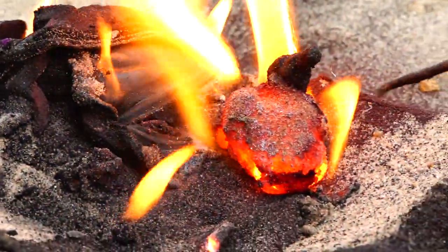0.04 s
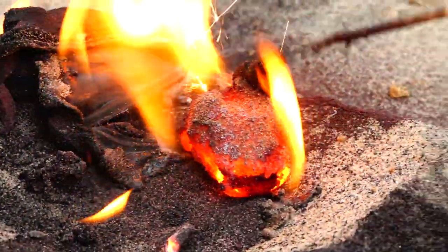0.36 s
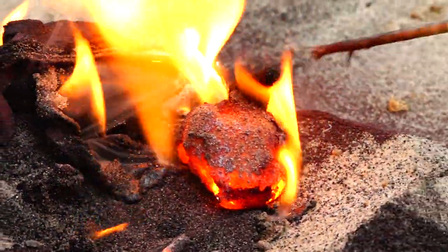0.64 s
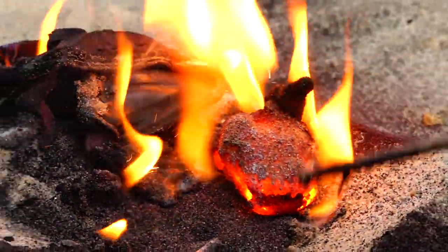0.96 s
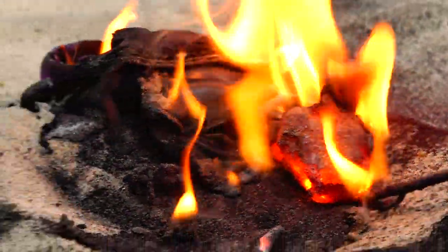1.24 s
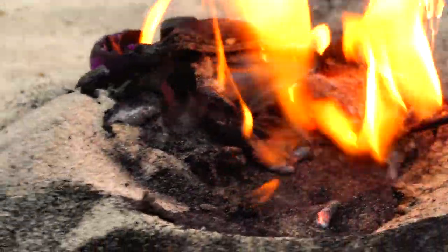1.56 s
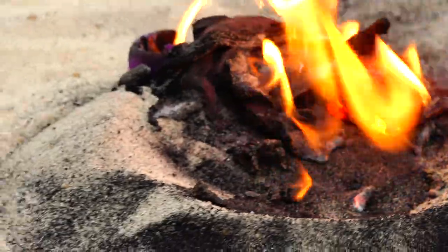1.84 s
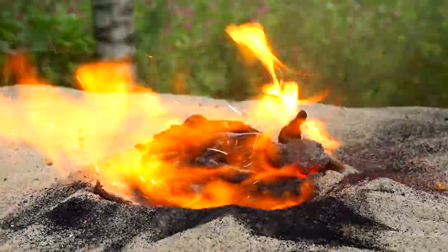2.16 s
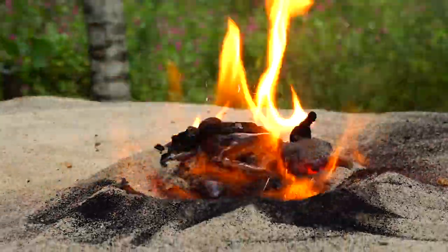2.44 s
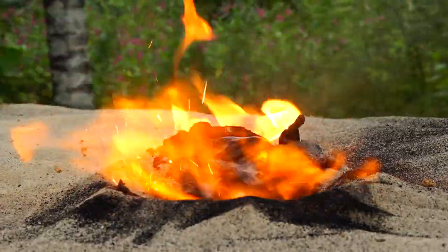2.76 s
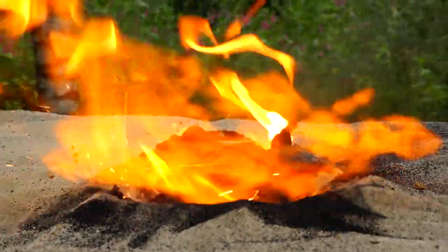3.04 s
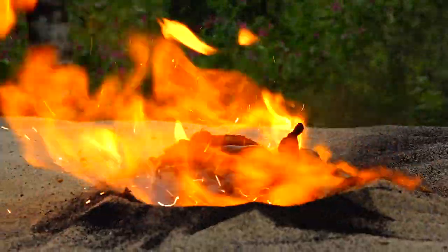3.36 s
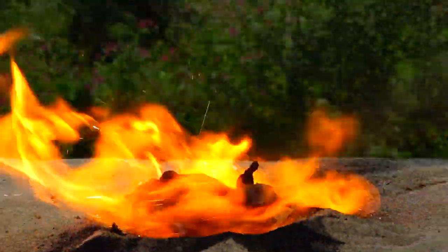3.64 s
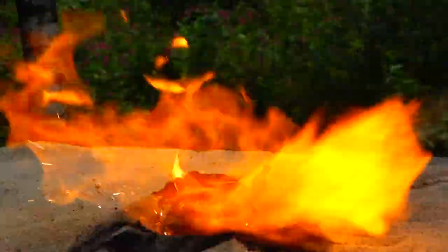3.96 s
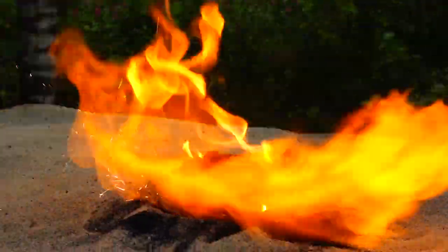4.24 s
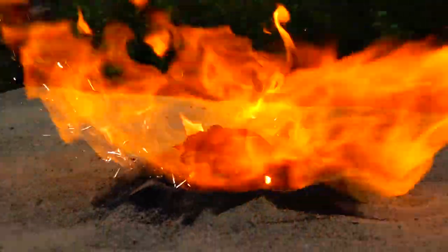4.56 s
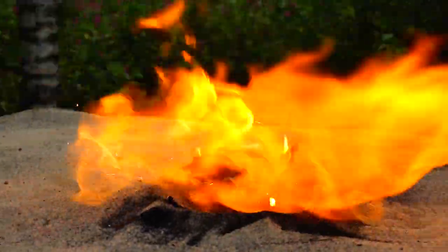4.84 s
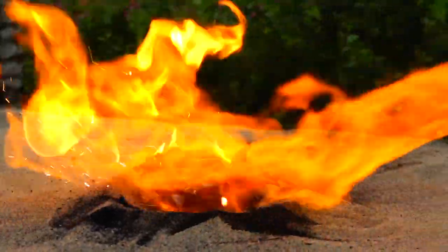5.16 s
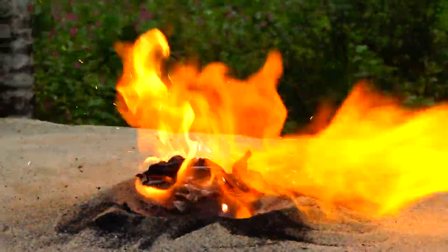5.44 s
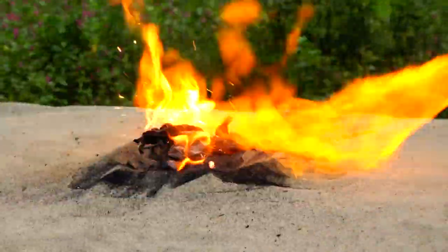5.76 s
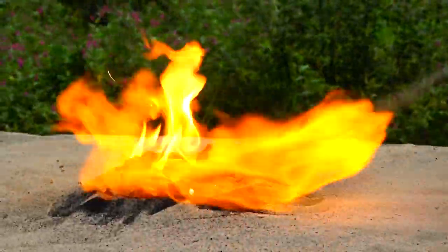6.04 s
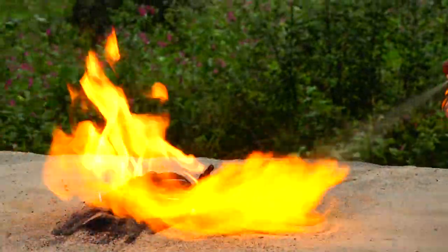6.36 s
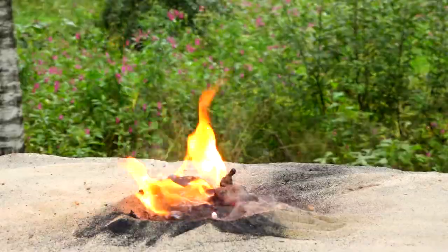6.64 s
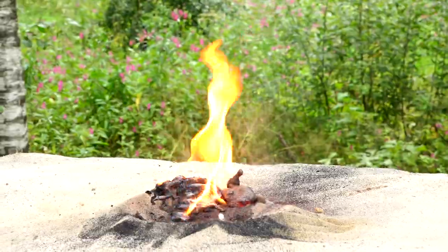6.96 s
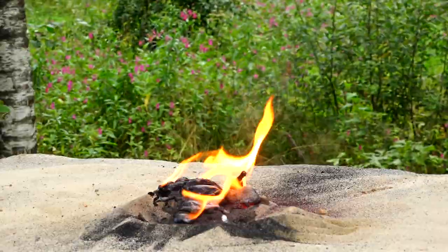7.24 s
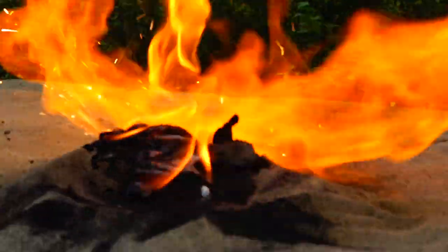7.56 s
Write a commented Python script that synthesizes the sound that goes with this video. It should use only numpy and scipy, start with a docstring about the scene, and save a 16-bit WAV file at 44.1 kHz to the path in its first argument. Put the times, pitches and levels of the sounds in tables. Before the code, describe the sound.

Embers snap softly until a spray can turns the fire into a hissing, roaring flame jet, with one long burst and one short one.

```python
"""A small fire on sand laps, puffs and crackles while a stick pokes it. At 1.9 s an aerosol can is sprayed
into it: the nozzle hisses, the spray roars as a turbulent flame jet that surges again and again, and the
ground reflection hollows the sound as things move. From 6.5 s only a few snaps and puffs remain in the
quiet outdoor air. A second, short burst follows at 7.3 s."""
import sys
import numpy as np
from scipy import signal
from scipy.fft import rfft, irfft
from scipy.io import wavfile
from scipy.ndimage import uniform_filter1d

SR = 44100
rng = np.random.default_rng(int(sys.argv[2]) if len(sys.argv) > 2 else 0)


def bounce(signal):
    """Save signal as a 16-bit WAV file at the path given by the first command-line argument."""
    frames = np.transpose(np.atleast_2d(signal))
    limited = np.clip(frames, -1, 1)
    pcm = np.round(limited * 32767).astype(np.int16)
    wavfile.write(sys.argv[1], SR, pcm)


N = 343980
FRAME, HOP = 512, 128
T = np.arange(N) / SR
FRAME_T = np.arange(N // HOP + 3) * HOP / SR
BIN_HZ = np.fft.rfftfreq(FRAME, 1 / SR)

# valve, one row per burst: open t/s, shut t/s
VALVE_S = [(1.923, 6.523), (7.282, 7.9)]


def spray_burst(burst):
    """One press of the valve: flame and hiss start and stop within milliseconds."""
    # left minus right, per burst: f/Hz, level/dB
    balance = [
        [(60, 0), (170, 1.5), (260, 5.5), (400, 9), (540, 17), (780, 7.5), (1050, 3.5), (1750, -2.5),
         (2900, 1.5), (4000, -1), (6500, -0.5), (11000, -3.5), (16000, -3.5)],
        [(60, 3), (170, 3), (260, 16), (430, 6), (700, -2), (1200, 0), (2000, -2.5), (2900, 1), (3700, -3),
         (6500, -3), (9000, -3.5), (16000, -6.5)],
    ]
    left = gain_of(spectrum(balance[burst]))
    ears = (2 * np.array([left, np.ones_like(left)]) / (1 + left))[:, None]
    open_s, shut_s = VALVE_S[burst]
    flow = np.clip((T - open_s) / 0.0094, 0, 1) * np.exp(-np.maximum(T - shut_s, 0) / 0.0071)
    ground, pit = ground_reflection(burst), hollow()
    roar = flame_jet(burst, ground * pit, ears)
    hiss = nozzle(burst, ground ** 1.2 * pit, ears)  # point source: deeper nulls
    jet = highpass(flow * (roar + hiss), hz=95)  # trims the deepest bass from roar and hiss
    return jet + scatter(jet, level_db=-28.5)


def flame_jet(burst, path, ears):
    """Burning spray: tiny ignitions and a few larger spits in turbulent noise, fluttering as a whole."""
    # steady flame as the can is aimed, per burst: t/s, roar/dB, rumble/dB, sizzle/dB
    levels = [
        [(1.94, -54, -80, -61), (2.18, -38, -55, -37), (2.45, -52.5, -68, -58.5), (2.6, -38, -54, -39.5),
         (2.85, -38.5, -57, -40), (3.05, -35, -53.5, -36), (3.55, -31, -42.5, -36), (3.8, -34.5, -49, -35.5),
         (3.98, -24, -34, -35), (4.16, -35, -42.5, -37), (4.3, -23.5, -33.5, -33.5), (4.55, -24.5, -45.5, -35),
         (5.15, -24, -48, -32), (5.5, -21.5, -41.5, -34), (5.82, -28.5, -55, -34), (6.0, -28.5, -42.5, -37),
         (6.3, -31.5, -37.5, -38.5), (6.52, -29, -39.5, -37.5)],
        [(7.29, -29.5, -28, -42), (7.39, -26, -23, -43.5), (7.46, -21.5, -32, -38.5),
         (7.63, -19.5, -25.5, -34.5), (7.8, -18.5, -24, -34)],
    ]
    # roar spectrum, per burst: f/Hz, level/dB
    shapes = [
        [(30, -54), (90, -62), (180, -17), (330, -8), (520, -1), (1050, -0.5), (1500, -6), (2400, -9.5),
         (3300, -15.5), (5000, -17.5), (6600, -20), (8500, -25.5), (11000, -39), (16000, -64)],
        [(30, -33), (90, -24), (170, -13), (270, -0.5), (440, -3), (700, -5), (900, -13), (1400, -10.5),
         (2300, -16), (3500, -19.5), (6000, -29.5), (9000, -29), (16000, -32)],
    ]
    roar_db, rumble_db, sizzle_db = follow(levels[burst])
    surge_db = 10 * np.log10(1 + surge_power() / gain_of(roar_db) ** 2)
    field = gain_of(spectrum(shapes[burst])) * path
    field *= gain_of(roar_db + surge_db - band_db(field, 400, 2500))
    # a wide flame rumbles, a tight one sizzles; surges lift both less than the roar
    bass_db = rumble_db + 0.15 * surge_db - band_db(field, 80, 330) - 2
    treble_db = sizzle_db + 0.65 * surge_db - band_db(field, 3000, 6500) - 0.52
    field *= gain_of(bass_db * spectrum([(260, 1), (600, 0.0077)]))
    field *= gain_of(treble_db * spectrum([(1400, 0.012), (3200, 0.94)]))
    turbulence = rng.standard_normal(N)
    ignitions = 0.5 * pops(per_s=3000, spread_db=3)
    spits = 0.19 * pops(per_s=250, spread_db=2)
    flutter = unit_rms(gain_of(0.85 * wander(6.6, 130)))
    drive = unit_rms(turbulence + ignitions + spits) * flutter
    return colour(drive, field * eddies(rms_db=1.02) * ears)


def surge_power(attack_s=0.017, release_s=0.015, sag_db_per_s=11):
    """Clouds of spray catch: each surge swells, sags as its cloud is used up, and dies."""
    # surges: t/s, length/s, level/dB
    surges = [(2.303, 0.038, -35.5), (2.54, 0.03, -36), (3.373, 0.039, -31.5), (3.429, 0.015, -24.5),
              (3.908, .06, -20.5), (4.03, 0.024, -23.5), (4.234, 0.091, -19), (4.338, 0.05, -26.5),
              (4.46, 0.038, -19.5), (4.541, .055, -21), (4.642, 0.2, -20), (4.882, 0.067, -20),
              (5.019, 0.037, -22.5), (5.204, 0.24, -20.5), (5.494, 0.052, -19.5), (5.563, .05, -21.5),
              (5.642, 0.11, -21.5), (5.886, 0.078, -20), (6.015, 0.068, -19), (6.08, 0.051, -21.5),
              (6.146, 0.032, -25), (6.215, 0.063, -27), (6.363, 0.052, -27), (7.34, 0.058, -23.5),
              (7.391, 0.048, -18), (7.558, .065, -21.5), (7.675, 0.074, -22.5)]
    power = np.zeros(len(FRAME_T))
    for start_s, length_s, db in surges:
        age_s = np.maximum(FRAME_T - start_s, 0)
        envelope = np.minimum(age_s / attack_s, 1) * np.exp(-np.maximum(age_s - length_s, 0) / release_s)
        power += (gain_of(db - sag_db_per_s * (age_s - length_s / 2)) * envelope) ** 2
    return power[:, None]


def nozzle(burst, path, ears):
    """Gas and droplets tear out of the can: a bright hiss with a shrill top."""
    # hiss, per burst: t/s, level/dB
    levels = [
        [(1.94, -35.5), (3.5, -35), (4.25, -39), (4.42, -43), (4.55, -36.5), (4.85, -41.5), (5.22, -37),
         (5.65, -45.5), (6.4, -40)],
        [(7.3, -30.5), (7.55, -31.5), (7.68, -44), (7.8, -49)],
    ]
    # hiss spectrum, per burst: f/Hz, level/dB
    shapes = [
        [(100, -10.5), (400, -9), (900, -5.5), (1500, -5), (4000, -4), (7500, -2), (9500, 1.5), (11300, 2.5),
         (12800, 2.5), (14500, 0.5), (16000, 1.5)],
        [(100, -30), (1500, -32), (4500, -3.5), (6500, -2), (8500, -2.5), (9600, 6), (10300, 7), (11100, 13),
         (11900, 3.5), (12700, -2), (13700, -9), (16000, -15)],
    ]
    # shrill band: t/s, emphasis/dB
    shrill = [(1.92, 7.5), (2.6, 6.5), (3.2, 2), (3.7, -1.5), (5.3, 2), (6.5, 3.5)]
    shrill_db = follow(shrill)[0] * bell(BIN_HZ - 14500, width_hz=1450)
    field = gain_of(spectrum(shapes[burst]) + shrill_db) * path
    field *= gain_of(follow(levels[burst])[0] - band_db(field, 9500, 15800) - 0.5)
    return colour(rng.standard_normal(N), field * eddies(rms_db=1) * ears)


def eddies(rms_db):
    """Short-lived patches of louder and softer turbulence."""
    noise = rng.standard_normal((len(FRAME_T), len(BIN_HZ)))
    patches = uniform_filter1d(uniform_filter1d(noise, size=10, axis=0), size=12, axis=1)
    return gain_of(rms_db * unit_rms(patches))


def ground_reflection(burst):
    """The reflection off the sand cancels the direct sound at odd multiples of the first null."""
    # first null, per burst: t/s, f/Hz, nominal depth/dB
    nulls = [
        [(1.92, 1460, -1), (2.38, 1820, 2), (2.65, 1790, 1.5), (3.28, 1945, 1), (3.45, 2000, 0),
         (3.75, 8000, -1), (3.98, 8140, 5), (4.18, 7900, -0.5), (4.32, 7350, 9.5), (4.85, 7200, 13.5),
         (5.2, 7300, 10.5), (5.4, 8500, 10), (5.52, 10500, 3), (6.1, 10800, 1), (6.3, 8000, 1.5)],
        [(7.28, 3700, 3.5), (7.55, 3520, 10), (7.68, 4760, 5), (7.8, 4950, 4)],
    ]
    null_hz, depth_db = follow(nulls[burst])
    comb = bell(BIN_HZ % (2 * null_hz) - null_hz, width_hz=480 + 0.098 * null_hz)
    treble_weight = spectrum([(1500, 0), (3500, 0.91)])
    return gain_of(-depth_db * comb * treble_weight)


def hollow(valley_hz=1980):
    """The jet blows across a pit in the pile: open at one end, it rings at f and 3f, a valley between."""
    # lowest resonance: t/s, f/Hz, emphasis/dB
    resonance = [(1.92, 860, -0.5), (3.05, 840, 2.5), (3.4, 870, 2), (3.6, 955, 3.5), (3.8, 1320, 5),
                 (4.1, 1380, 2), (4.7, 1380, 1.5)]
    hz, emphasis_db = follow(resonance)
    peaks = bell(BIN_HZ - hz, 150) + 0.99 * bell(BIN_HZ - 3 * hz, 420)
    return gain_of(emphasis_db * (peaks - 0.72 * bell(BIN_HZ - valley_hz, 320)))


def embers():
    """Snaps with tiny cracks before and crumbs after, over a crackle that swells as the stick stirs."""
    # loudest snaps: t/s, energy/dB, tilt/(dB/octave)
    snaps = [(0.014, -15.5, 1), (0.0747, -25, 0), (0.1623, -18, 1), (0.3265, -25, 5), (0.3535, -14, 2),
             (0.3575, -16, 1), (0.3776, -10, 1), (0.3842, -23, 3), (0.4217, -18, -3), (0.452, -21.5, 0),
             (0.5076, -17, 2.5), (0.5745, -23, 2), (0.6318, -17, 3.5), (0.6974, -19, -2), (0.7273, -26, -4),
             (0.7878, -26, -0.5), (0.8239, -23, -3), (0.8984, -23, 3), (0.986, -21, 6), (0.9994, -22, 4),
             (1.01, -18.5, 8), (1.0288, -15.5, -4), (1.1207, -21.5, -1.5), (1.155, -26, -8),
             (1.169, -22, 0), (1.2847, -19.5, -1), (1.3247, -16, -1), (1.3637, -17.5, -2), (1.3982, -20, 1),
             (1.407, -16.5, 3), (1.4228, -16.5, 0), (1.4418, -16, 1), (1.457, -17, 4), (1.492, -17.5, 1),
             (1.4972, -20, 5), (1.516, -20, 9), (1.618, -18, 8), (1.6252, -18, -5), (1.642, -18.5, 2.5),
             (1.682, -19, 1), (1.8373, -21, -1.5), (1.9166, -22, 11), (6.7567, -27, 12), (6.8446, -31, -3),
             (6.9074, -31, -10), (7.111, -29, -13)]
    # fine crackle: t/s, level/dB
    crackle = [(0.0, -62), (0.3, -59), (0.36, -49.5), (0.41, -55.5), (0.56, -59.5), (1.25, -63),
               (1.42, -48.5), (1.51, -49), (1.58, -53.5), (1.92, -60.5)]
    lead = SR // 250
    out, t = np.zeros(N), np.arange(-lead, SR // 100) / SR
    for at_s, db, tilt_db in snaps:
        crumbs = 0.11 * rng.standard_normal(len(t)) * np.exp(-abs(t) / np.where(t < 0, 0.0007, 0.0018))
        splinter_hz = rng.uniform(1240, 5600)
        splinter = 0.18 * (t > 0) * np.cos(2 * np.pi * splinter_hz * t) * np.exp(-abs(t) / 0.00058)
        snap = signal.fftconvolve(char_click(tilt_db), (t == 0) + crumbs + splinter)
        add(out, at_s - lead / SR, -gain_of(db) * snap / np.linalg.norm(snap))
    stir_db = np.interp(T, *np.transpose(crackle)) + 2 * wander(33, 80)
    stir = gain_of(stir_db) * (T < VALVE_S[0][0])
    grains = pops(per_s=700, spread_db=4.5)
    ticks = gain_of(-0.5) * pops(per_s=60, spread_db=3)
    out -= signal.oaconvolve(stir * (grains + ticks), char_click(-3))[:N]
    stereo = out * gain_of([[-0.3], [0.3]])
    return stereo + scatter(stereo, level_db=-33)


def char_click(tilt_db):
    """Breaking char: a minimum-phase click of energy 1."""
    # click spectrum: f/Hz, level/dB
    shape = [(40, -40), (150, -8), (400, 0), (1200, 2), (2500, 2.5), (4600, 3.5), (6200, -5), (8300, 1),
             (10500, -14), (13500, -5), (16000, -17)]
    hz = np.fft.rfftfreq(1024, 1 / SR)
    log_gain = np.log(gain_of(spectrum(shape, hz) + tilt_db * np.log2((hz + 500) / 4000)))
    log_response = signal.hilbert(np.r_[log_gain, log_gain[-2:0:-1]]).conj()
    click = np.fft.ifft(np.exp(log_response)).real
    return click / np.linalg.norm(click)


def puffs():
    """Gas pockets flare with a low thump: a few rough cycles that fall in pitch as the pocket swells."""
    # flares: t/s, level/dB, nominal f/Hz, time scale/s
    flares = [(0.218, -34, 176, 0.013), (0.469, -40, 142, 0.026), (0.5, -29.5, 160, 0.016),
              (0.62, -36, 220, 0.0092), (0.681, -41, 130, 0.025), (0.824, -39, 330, 0.006),
              (0.905, -44, 180, 0.019), (1.011, -34.5, 215, 0.019), (1.508, -33.5, 173, 0.02),
              (3.952, -43, 55, 0.018), (4.254, -42, 50, .02), (4.305, -39, 50, 0.015),
              (6.696, -46, 600, .006), (6.997, -42.5, 604, 0.0055), (7.111, -49, 680, .006),
              (7.386, -14.5, 169, 0.012)]
    out, t = np.zeros(N), np.arange(SR // 10) / SR
    churn = wander(90, 480)
    for at_s, db, hz, scale_s in flares:
        age = t / scale_s
        cycles = np.cumsum(hz * (0.62 + 1.7 * np.exp(-age / 0.352))) / SR
        roughness = 0.57 * np.interp(at_s + t * hz / 170, T, churn)  # small, high pockets churn faster
        envelope = (age / 0.5) ** 2 * np.exp(2 - 2 * age / 0.39)
        add(out, at_s, gain_of(db) * envelope * (np.sin(2 * np.pi * cycles) + roughness))
    return highpass(out, hz=55) * gain_of([[2.5], [-3.5]])


def small_flames():
    """Flames lap close by and steam fizzes out of the fuel, until the first burst."""
    # flame spectrum: f/Hz, level/dB
    shape = [(25, -4), (60, 4.5), (160, 7), (330, -4.5), (560, 6), (800, -13), (1300, -4), (2200, -38),
             (3300, -45), (4800, -32), (6400, -22), (7900, -4), (9300, -19), (11000, -17), (16000, -34)]
    # flames: t/s, level/dB
    levels = [(0.0, -61), (0.262, -61.5), (0.956, -62), (1.262, -61.5), (1.492, -56), (1.732, -60),
              (1.92, -66)]
    field = gain_of(spectrum(shape))
    level_db = follow(levels)[0] - band_db(field, 200, 1200) - 0.5
    lapping_db = 2.5 * np.interp(FRAME_T, T, wander(5, 50))[:, None]
    return stereo_noise(field * gain_of(level_db + lapping_db), width=0.44) * (T < VALVE_S[0][0])


def scatter(x, level_db):
    """Faint, diffuse returns from the bushes, opposite in the two ears."""
    t = np.arange(SR // 8) / SR
    tail = rng.standard_normal(len(t)) * (t > 0.002) * np.exp(-t / 0.0047)
    returns = signal.oaconvolve(x.mean(0), tail / np.linalg.norm(tail))[:N]
    return gain_of(level_db) * returns * np.array([[1], [-1]])


def outdoors(air_db=-58.5, waver_hz=3):
    """Quiet open air with a few wavering far tones."""
    # air spectrum: f/Hz, level/dB
    shape = [(40, -38), (80, -29), (120, -7), (220, 1), (330, -1.5), (700, -2), (1000, -3), (1400, -5),
             (2000, -7), (3300, -11.5), (4000, -8), (5500, -9), (7500, -16), (12000, -18), (16000, -15.5)]
    # far tones: f/Hz, level/dB
    tones = [(225, -69.5), (777, -79), (1383, -72)]
    hum = np.zeros(N)
    for hz, db in tones:
        cycles = np.cumsum(hz + waver_hz * wander(1.95, 30)) / SR
        hum += gain_of(db) * np.sqrt(2) * np.sin(2 * np.pi * cycles)
    return gain_of(air_db) * unit_rms(stereo_noise(gain_of(spectrum(shape)), width=0.23)) + hum


def gain_of(db):
    """dB to amplitude factor."""
    return 10 ** (np.asarray(db) / 20)


def unit_rms(x):
    """Scales to rms 1."""
    return x / np.sqrt(np.mean(x ** 2) + 1e-20)


def bell(offset_hz, width_hz):
    """Gaussian of height 1."""
    return np.exp(-(offset_hz / width_hz) ** 2)


def spectrum(points, hz=BIN_HZ):
    """Interpolates a table over log frequency."""
    f, value = np.transpose(points)
    return np.interp(np.log(hz + 1), np.log(f + 1), value)


def follow(rows):
    """Interpolates each column of a time table (frames x 1)."""
    times_s, *columns = np.transpose(rows)
    return [np.interp(FRAME_T, times_s, column)[:, None] for column in columns]


def add(mix, at_s, sound):
    """Mixes a sound in, in place."""
    part = mix[max(round(at_s * SR), 0):][:len(sound)]
    part += sound[:len(part)]


def wander(lo_hz, hi_hz):
    """Random drift of rms 1, equal power per octave in the band."""
    f = np.fft.rfftfreq(N, 1 / SR) + 1e-3
    rolloff = np.sqrt(f * (1 + (lo_hz / f) ** 4) * (1 + (f / hi_hz) ** 4))
    return unit_rms(irfft(rfft(rng.standard_normal(N)) / rolloff, N))


def pops(per_s, spread_db):
    """Sparse clicks of rms 1, most small, a few large."""
    size = gain_of(spread_db * np.minimum(rng.exponential(1, N), 4))
    return unit_rms(size * rng.choice([-1, 1], N) * (rng.random(N) < per_s / SR))


def band_db(field, lo_hz, hi_hz):
    """Band level of white noise after a gain field."""
    band = (BIN_HZ >= lo_hz) & (BIN_HZ < hi_hz)
    return 10 * np.log10(np.sum(field ** 2 * band, -1, keepdims=True) / len(BIN_HZ) + 1e-20)


def highpass(x, hz):
    """Second-order high-pass."""
    return signal.sosfilt(signal.butter(2, hz, "high", fs=SR, output="sos"), x)


def colour(x, field):
    """Filters x by a gain field (bins, or frames x bins, or ears x frames x bins)."""
    z = signal.stft(np.pad(x, (0, FRAME)), nperseg=FRAME, noverlap=FRAME - HOP)[2][:, :len(FRAME_T)]
    shaped = np.swapaxes(z.T * field, -1, -2)
    return signal.istft(shaped, nperseg=FRAME, noverlap=FRAME - HOP)[1][..., :N]


def stereo_noise(field, width):
    """Coloured noise, partly different in the two ears."""
    mid, side = (colour(rng.standard_normal(N), field) for _ in range(2))
    return mid + width * side * np.array([[1], [-1]])


def scene():
    """Two bursts of spray, the fire and the open air."""
    return spray_burst(0) + spray_burst(1) + puffs() + embers() + small_flames() + outdoors()


def record(dry):
    """Band limit: steep low-pass."""
    lowpass = signal.firwin(511, 15900, window=("kaiser", 9), fs=SR)
    return signal.oaconvolve(dry, lowpass[None], "same")


dry = scene()
out = record(dry)
bounce(out)
```